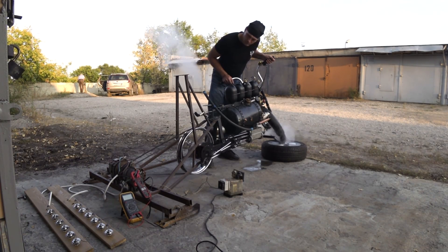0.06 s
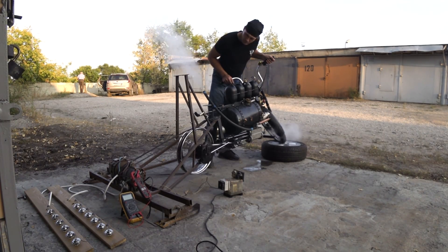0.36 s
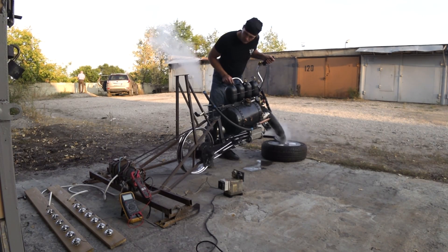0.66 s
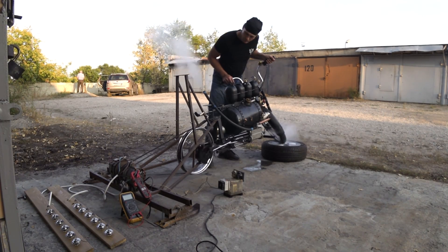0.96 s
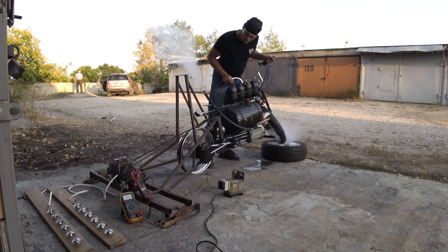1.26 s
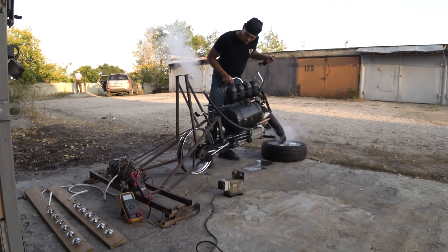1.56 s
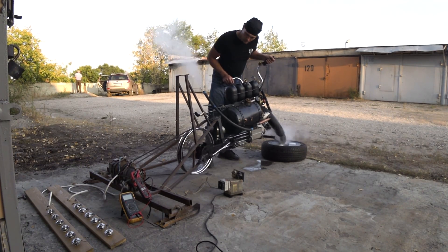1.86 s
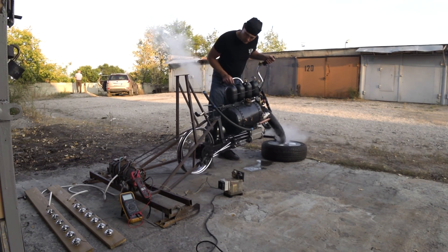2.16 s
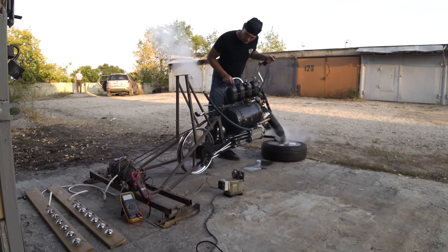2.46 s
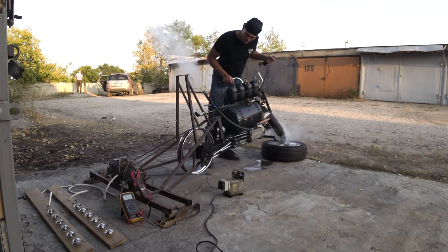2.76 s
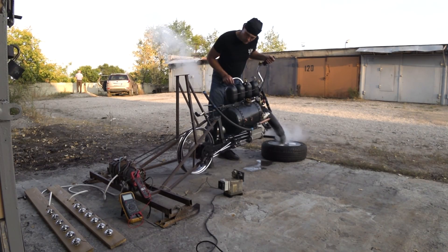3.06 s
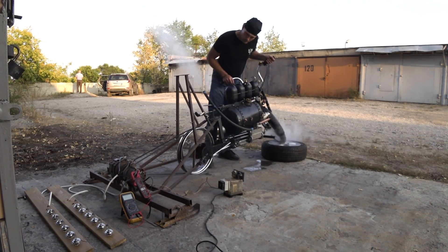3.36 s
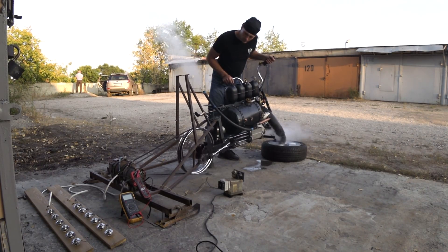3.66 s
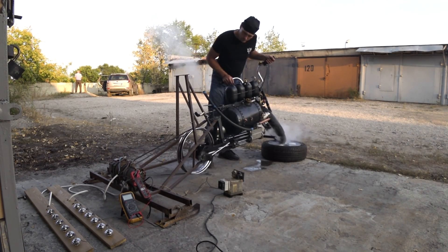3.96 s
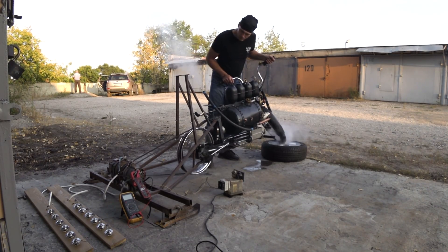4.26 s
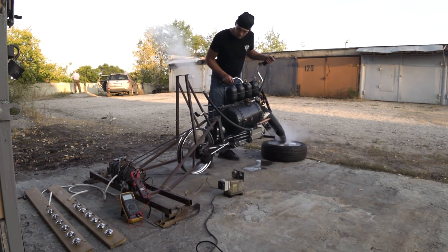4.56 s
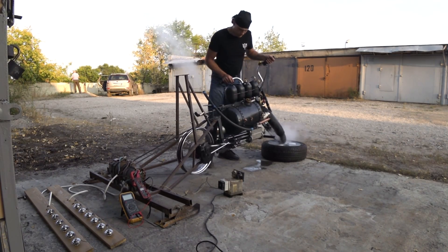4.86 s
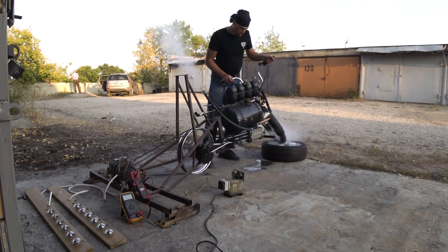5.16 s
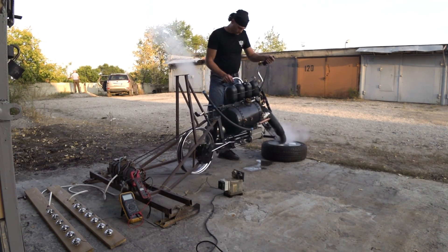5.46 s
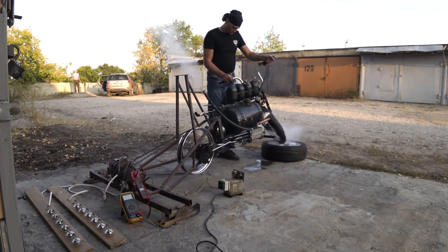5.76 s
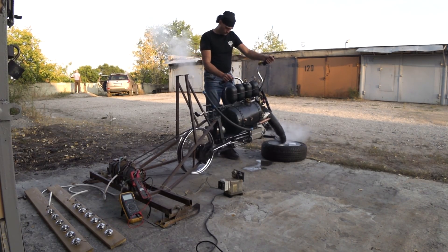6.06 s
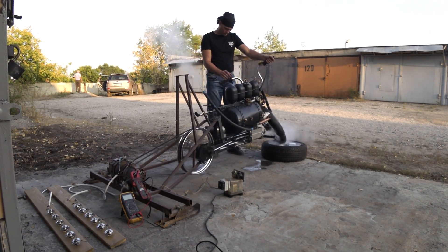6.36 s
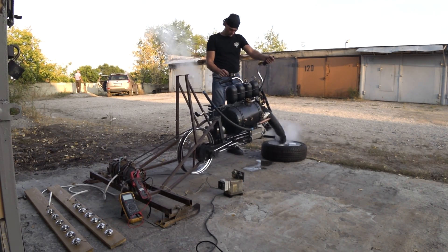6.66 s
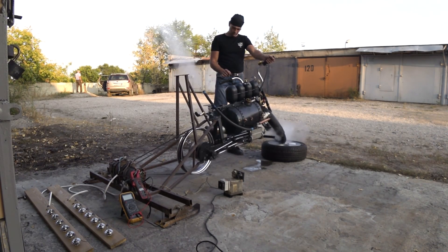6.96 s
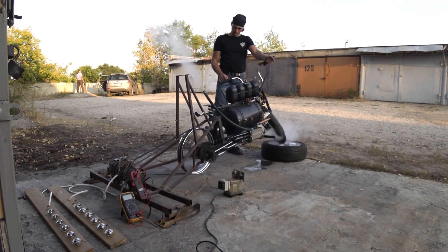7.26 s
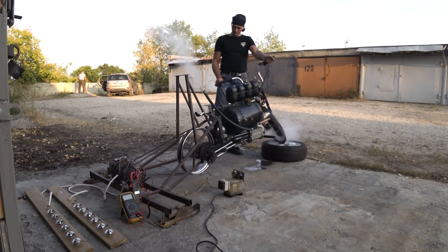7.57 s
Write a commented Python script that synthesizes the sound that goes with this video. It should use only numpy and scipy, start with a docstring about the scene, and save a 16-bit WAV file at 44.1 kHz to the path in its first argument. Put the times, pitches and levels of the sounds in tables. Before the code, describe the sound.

Rapid hollow chuffs alternate with sharp steam hisses as a steam-driven motorcycle engine picks up speed and keeps running in a yard.

```python
"""A hollow chuff, a thump, a sharp hiss, over and over: a small steam engine on a motorcycle frame
runs up to about seven turns a second. One stroke exhausts down a hose, fluttered by the drive chain;
on the other, steam jets out. The piston thumps at each end of its travel, the valve gear rasps twice
a turn and a steel link clinks once, over a soft leak and a low rumble.
A row of garages throws the sound back across the yard."""
import sys
import numpy as np
from scipy import signal
from scipy.fft import irfft
from scipy.io import wavfile

SR = 44100
rng = np.random.default_rng(int(sys.argv[2]) if len(sys.argv) > 2 else 0)


def generate_wav(sig):
    """Save sig (samples, or channels by samples) to the path in sys.argv[1] as 16-bit PCM at SR."""
    pcm = np.round(np.clip(np.atleast_2d(sig).T, -1, 1) * 32767).astype(np.int16)
    wavfile.write(sys.argv[1], SR, pcm)


N = 335601
TIME_S = np.arange(N) / SR
FREQ_HZ = np.maximum(np.fft.rfftfreq(N, 1 / SR), 1)

# Steam flow over one turn at full speed. Each row: crank angle in turns, relative level in dB.
EXHAUST_FLOW_DB = [(0, -1), (.1, -4), (.22, -7.5), (.42, -7), (.52, -4), (.62, -0.74), (.78, -0.5),
                   (.92, 0.5)]
LEAK_FLOW_DB = [(0, -1), (.15, 5.5), (.3, -1), (.48, -0.5), (.62, 0), (.76, 2)]
JET_FLOW_DB = [(0, -0.6), (.04, -1), (.09, 1.3), (.2, -1.5), (.35, 0.5), (.45, -4.5), (.57, -14.5),
               (.7, -17.5), (.89, -11.5), (.95, -2.5)]
# Broad noise spectra. Each row: frequency in Hz, relative spectral density in dB.
EXHAUST_SPECTRUM = [(150, -8.5), (360, -18), (470, -2), (640, 1.5), (860, -2.5), (1200, 1.5), (1550, -2),
                    (2050, -1), (2350, -9), (3000, -6.5), (3600, -12.5), (15000, -27)]
LEAK_SPECTRUM = [(700, -9), (1700, -3), (2900, -1.5), (3600, -9), (4700, 0.5), (6500, 4), (7700, 3.5),
                 (8700, -2), (10000, -1), (11500, -0.5), (13500, -5.5), (15700, -13)]
RUMBLE_SPECTRUM = [(15, -18), (40, 3), (100, -6), (160, -6.5), (260, -9), (360, -20.5), (1000, -30),
                   (15000, -65)]
JET_SPECTRUM = [(2500, -47), (3800, -14.5), (4250, -13), (4600, -2), (5200, -1), (6000, -1.5), (8200, -7),
                (8550, -15.5), (9600, -1), (11400, 0.5), (12650, -2.5), (12980, -13), (14600, -10.5),
                (15700, -9)]
# Resonances and notches of the steam passages. Each row: centre in Hz, width in Hz, lift in dB.
HOSE_RESONANCES = [(460, 41, 0.67), (607, 20, 3.9), (711, 46, 7.8), (1095, 56, 2.4), (1190, 52, 7.9),
                   (1314, 29, 6.4)]
JET_RESONANCES = [(4866, 320, 5), (5120, 158, -15), (5790, 220, 2.5), (6660, 190, 4), (6960, 85, -11),
                  (7020, 90, 9), (7670, 110, 9), (8030, 57, 8), (9790, 140, 6.5), (9870, 70, -5),
                  (10200, 80, 0.5), (10300, 190, 7.5), (10560, 190, -5), (11350, 150, 5), (12710, 130, 7.5),
                  (13800, 100, 7), (14460, 150, 4), (15100, 200, 4)]
# Valve gear rasps. Each row: onset in turns, decay in turns, centre in Hz, width in Hz, gain in dB.
VALVE_RASPS = [(.05, 0.13, 2124, 171, -24.5), (.05, .15, 1700, 130, -27), (.06, 0.089, 2700, 700, -30.5),
               (.73, 0.15, 2500, 160, -31), (0.732, 0.076, 2980, 70, -32), (.725, 0.061, 11000, 2000, -21)]
# Piston and rod jolts. Each row: crank angle in turns, half length in seconds,
# peak at full speed in dB, exponent of growth with speed.
PISTON_JOLTS = [(.003, 0.0033, -19.5, .3), (0.265, 0.0035, -33, 2.5), (0.508, 0.0027, -20.5, 2.7),
                (0.752, .0036, -23.5, 3.2), (.88, .0048, -43, 3)]
# Garage reflections. Each row: delay in seconds, gain in dB.
GARAGE_ECHOES = [(.058, -30.5), (.112, -25)]


def from_db(db):
    """Decibels to gain."""
    return 10 ** (np.asarray(db) / 20)


def shaped_noise(gain):
    """Unit-rms noise with the given relative gain at each frequency."""
    bins = rng.standard_normal(len(FREQ_HZ)) + 1j * rng.standard_normal(len(FREQ_HZ))
    noise = irfft(gain * bins, N)
    return noise / np.sqrt(np.mean(noise ** 2) + 1e-20)


def turbulence(spectrum, resonances=()):
    """Flow noise: a broad spectrum plus the resonances of its passage."""
    hz, db = np.transpose(spectrum)
    level_db = np.interp(np.log(FREQ_HZ), np.log(hz), db)
    for centre_hz, width_hz, lift_db in resonances:
        level_db += lift_db / (1 + (2 * (FREQ_HZ - centre_hz) / width_hz) ** 2)
    low_cut = 1 / np.sqrt(1 + (hz[0] / 2 / FREQ_HZ) ** 4)
    return shaped_noise(from_db(level_db) * low_cut)


def drift(rate_hz):
    """Unit-rms random wander, mostly below rate_hz."""
    return shaped_noise(1 / (1 + (FREQ_HZ / rate_hz) ** 2))


def butter(order, edges_hz, kind="low"):
    """Butterworth filter sections."""
    return signal.butter(order, edges_hz, kind, fs=SR, output="sos")


def port_db(flow, turns):
    """Level of a port that opens and closes with the crank."""
    angles, db = np.transpose(flow)
    return np.interp(turns, angles, db, period=1)


def each_turn(turns):
    """Glides between unit-spread random values, one per turn."""
    whole_turns = np.arange(np.floor(turns[0]), turns[-1] + 1)
    return np.interp(turns, whole_turns, rng.standard_normal(len(whole_turns)))


def crank(start_hz=3.813, target_hz=6.921, run_up_s=1.102, sag_from_s=5.346, sag_hz_per_s=0.0646,
          dead_centre_s=0.0586):
    """Turns since the first dead centre, and speed: a quick run-up, a slight late sag."""
    speed_hz = target_hz - (target_hz - start_hz) * np.exp(-TIME_S / run_up_s)
    speed_hz -= sag_hz_per_s * np.maximum(TIME_S - sag_from_s, 0)
    turns = np.cumsum(speed_hz) / SR
    return turns - np.interp(dead_centre_s, TIME_S, turns), speed_hz


def exhaust(turns, slowness, drive_db, gain_db=-1.66, chain_teeth=15, flutter_db=1.0):
    """The return stroke chuffs through the hose; its low notes flutter with each chain tooth."""
    chuff = turbulence(EXHAUST_SPECTRUM, HOSE_RESONANCES)
    note = signal.sosfiltfilt(butter(4, [620, 830], "band"), chuff)
    pitch_ratio = 1 + 0.17 * slowness   # the hollow note sinks as speed rises
    sinking_note = np.interp(np.cumsum(pitch_ratio), np.arange(N), note, period=N)
    chuff = chuff - note + sinking_note
    lows = signal.sosfiltfilt(butter(2, 950), chuff)
    flutter = np.cos(2 * np.pi * (chain_teeth * turns - 0.1))
    chuff = chuff - lows + lows * from_db(flutter_db * flutter)
    flow_db = port_db(EXHAUST_FLOW_DB, turns) * (1 + 2.3 * slowness)   # slow turns let the hose empty
    sputter_db = 0.5 * drift(180) + 0.64 * drift(11)
    return chuff * from_db(drive_db + gain_db + flow_db + sputter_db)


def leak(turns, slowness, drive_db, gain_db=-3.0, sputter_db=1.2):
    """A softer, duller hiss escapes all through the turn, following the steam pressure."""
    flow_db = port_db(LEAK_FLOW_DB, turns) * (1 + 1.9 * slowness)
    return turbulence(LEAK_SPECTRUM) * from_db(drive_db + gain_db + flow_db + sputter_db * drift(110))


def valve_gear(turns, drive_db, attack_turns=0.025, grit_db=1.2):
    """Sliding parts rasp at set crank angles and ring off, harder under load."""
    rasps = 0
    for onset_turns, decay_turns, centre_hz, width_hz, gain_db in VALVE_RASPS:
        age_turns = (turns - onset_turns) % 1
        envelope = np.minimum(age_turns / attack_turns, 1) * np.exp(-age_turns / decay_turns)
        ringing = shaped_noise(1 / (1 + (2 * (FREQ_HZ - centre_hz) / width_hz) ** 2))
        rasps += from_db(gain_db) * envelope * ringing
    load_db = drive_db - np.mean(drive_db)
    return rasps * from_db(load_db + grit_db * drift(200))


def clink(turns, speed_hz, onset_turns=0.735, ring_hz=2493, decay_s=0.02, level_db=-24, uneven_db=1.5):
    """A steel link, tapped once a turn, rings briefly."""
    age_s = (turns - onset_turns) % 1 / speed_hz
    ring = np.sin(2 * np.pi * ring_hz * age_s) * np.exp(-age_s / decay_s)
    return ring * from_db(level_db + uneven_db * drift(4.3))


def rumble(turns, slowness, level_db=-37.5, swing_db=2.0, loudest_turns=0.88):
    """Frame and billowing steam rumble, most with the exhaust open and the engine labouring."""
    opening = np.cos(2 * np.pi * (turns - loudest_turns))
    labour_db = 9 * slowness * (1 + opening) / 2
    return turbulence(RUMBLE_SPECTRUM) * from_db(level_db + swing_db * opening + labour_db)


def piston_thumps(turns, speed_hz, knock_db=-21.5, knock_s=0.0009, knock_lead_s=0.0018, uneven_db=0.1):
    """Jolts shove the frame; the air follows its acceleration. Bearing play knocks at dead centre."""
    def offset_s(at_turns):
        """Signed time from the nearest pass of a crank angle."""
        return ((turns - at_turns + 0.5) % 1 - 0.5) / speed_hz

    thumps = 0
    for at_turns, half_length_s, peak_db, exponent in PISTON_JOLTS:
        u = offset_s(at_turns) / half_length_s
        peak = from_db(peak_db) * (speed_hz / speed_hz.max()) ** exponent
        thumps += peak * (1 - u ** 2) * np.exp(-u ** 2 / 2)
    u = (offset_s(0) + knock_lead_s) / knock_s
    knock = from_db(knock_db) * u * np.exp(-u ** 2 / 2)
    return (thumps + knock) * from_db(uneven_db * drift(11))


def steam_jet(turns, drive_db, thinning_db=2.5):
    """Wet steam jets out on the working stroke; its lower hiss thins as the cylinder empties."""
    hiss = turbulence(JET_SPECTRUM, JET_RESONANCES)
    lows = signal.sosfiltfilt(butter(2, 8700), hiss)
    emptying = np.sin(2 * np.pi * (turns - 0.15))
    hiss = hiss - lows + lows * from_db(-thinning_db * emptying)
    sputter_db = 0.96 * drift(260) + 0.5 * drift(25)
    return hiss * from_db(drive_db + port_db(JET_FLOW_DB, turns) + sputter_db)


def yard(direct, scatter_db=-15, scatter_decay_s=0.014):
    """Frame, boiler and ground scatter the sound; the garages return two faint, dull echoes."""
    lag_s = TIME_S[:SR // 20]
    paths = rng.standard_normal(len(lag_s)) * np.exp(-lag_s / scatter_decay_s)
    treble = signal.sosfilt(butter(2, 900, "high"), direct)   # long waves bend round small parts
    scattered = signal.fftconvolve(treble, paths / np.linalg.norm(paths))[:N]
    dull = signal.sosfilt(butter(2, [300, 7000], "band"), direct)
    echoes = sum(from_db(gain_db) * np.interp(TIME_S - delay_s, TIME_S, dull, left=0)
                 for delay_s, gain_db in GARAGE_ECHOES)
    return direct + from_db(scatter_db) * scattered + echoes


def scene(jet_fall_db_per_s=0.09, exhaust_fall_db_per_s=0.62):
    """The crank times every source; sinking steam pressure weakens both strokes. Channels are alike."""
    turns, speed_hz = crank()
    slowness = 1 - speed_hz / speed_hz.max()
    jet_drive_db = -12.5 - jet_fall_db_per_s * TIME_S + 0.35 * each_turn(turns)
    exhaust_drive_db = -17.5 - exhaust_fall_db_per_s * TIME_S - 3 * slowness + 0.48 * each_turn(turns)
    engine = (steam_jet(turns, jet_drive_db)
              + exhaust(turns, slowness, exhaust_drive_db)
              + leak(turns, slowness, exhaust_drive_db)
              + valve_gear(turns, exhaust_drive_db)
              + clink(turns, speed_hz)
              + piston_thumps(turns, speed_hz)
              + rumble(turns, slowness))
    return np.tile(yard(engine), (2, 1))


def record(dry, ceiling=2.0, cutoff_hz=15650):
    """Soft peak rounding, then a steep low-pass."""
    low_pass = signal.ellip(12, 0.1, 80, cutoff_hz, fs=SR, output="sos")
    return signal.sosfilt(low_pass, ceiling * np.tanh(dry / ceiling))


dry = scene()
out = record(dry)
generate_wav(out)
```